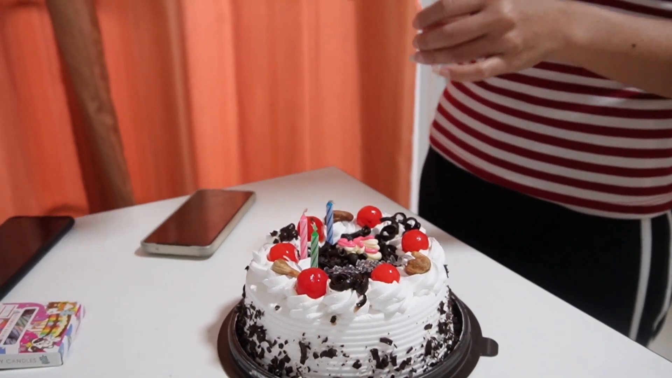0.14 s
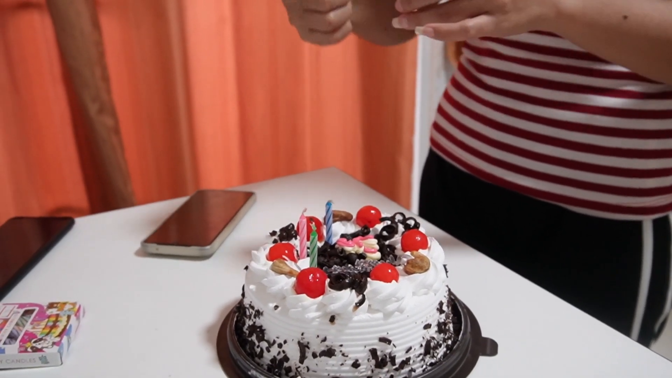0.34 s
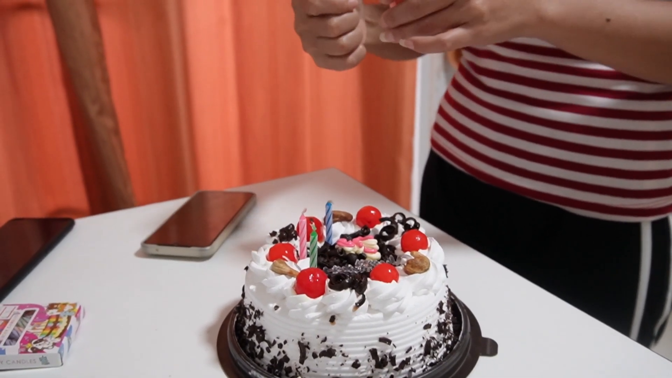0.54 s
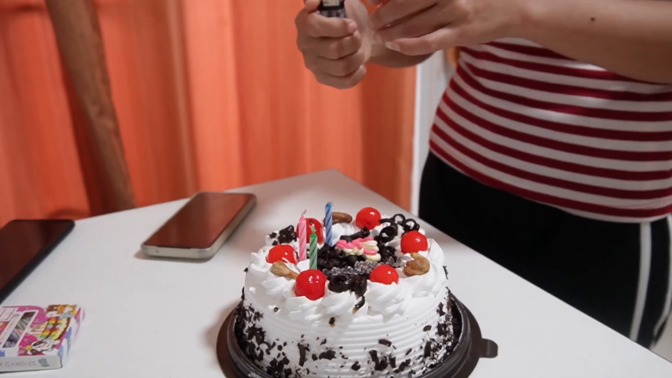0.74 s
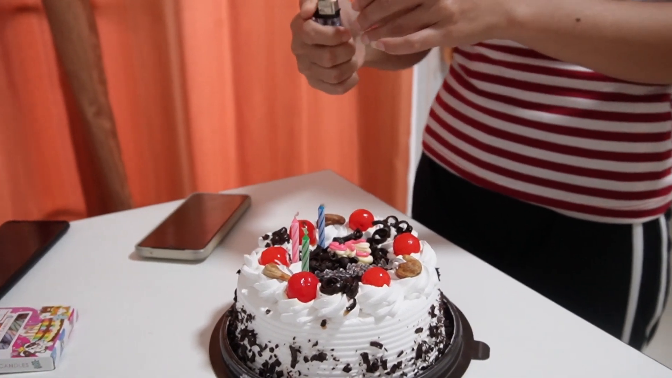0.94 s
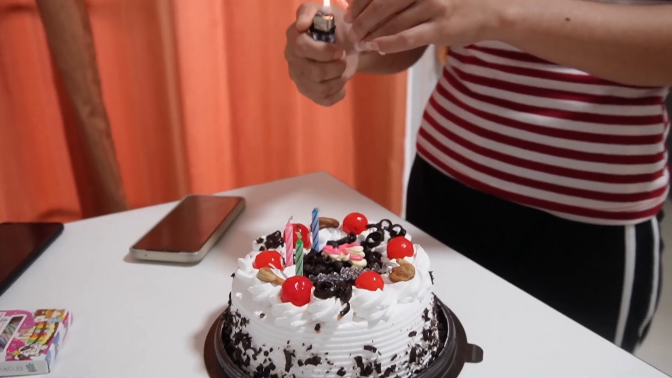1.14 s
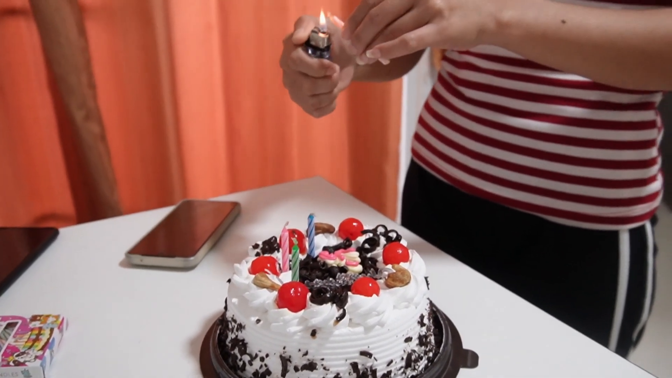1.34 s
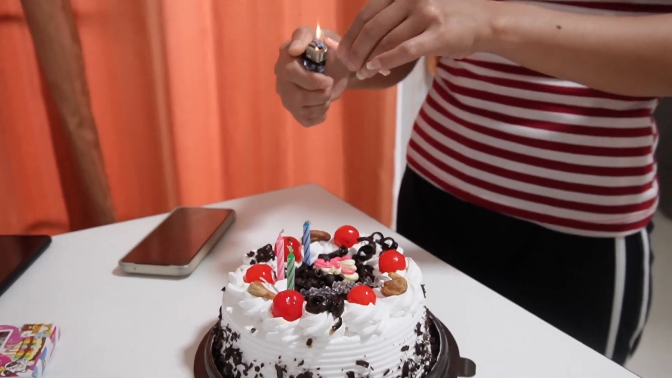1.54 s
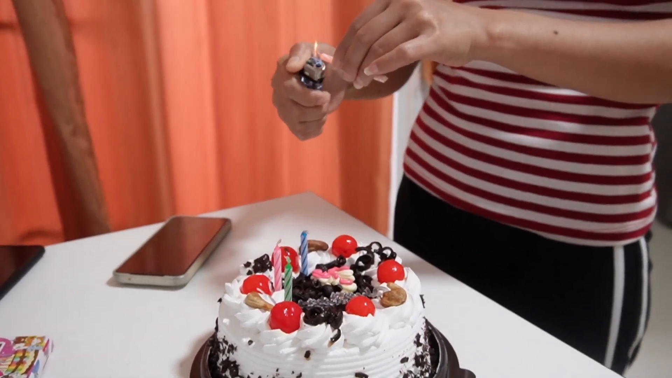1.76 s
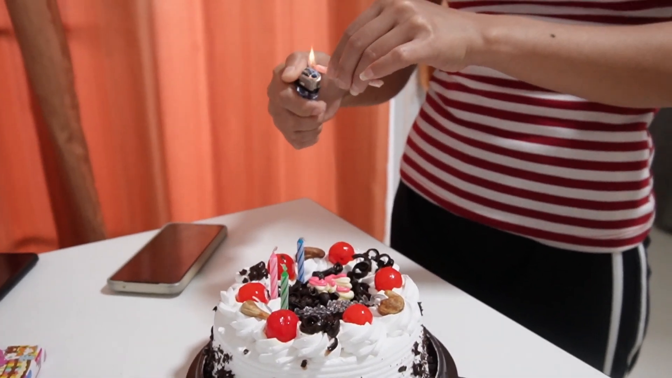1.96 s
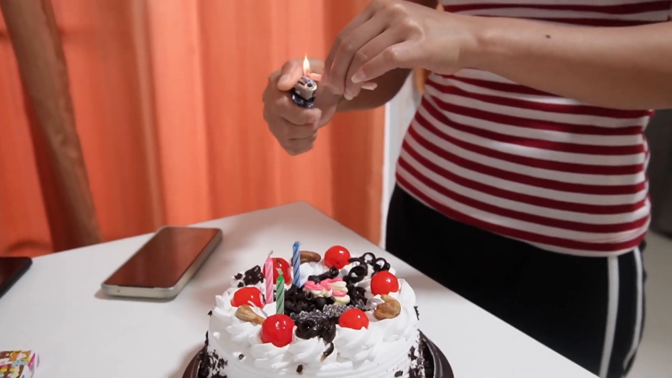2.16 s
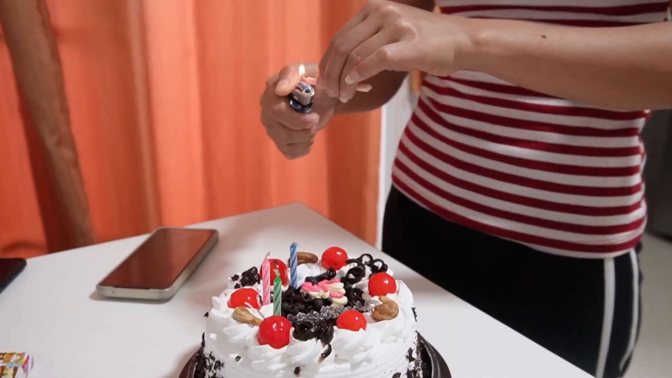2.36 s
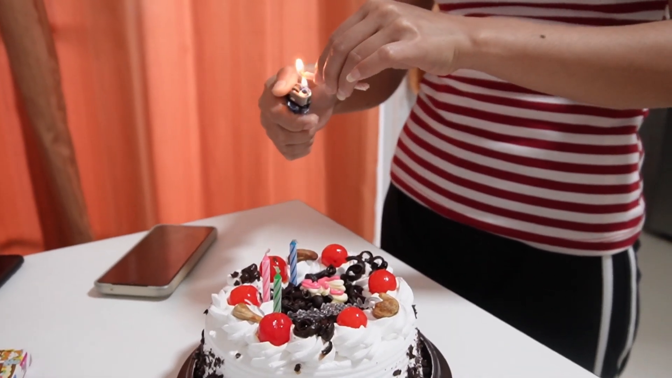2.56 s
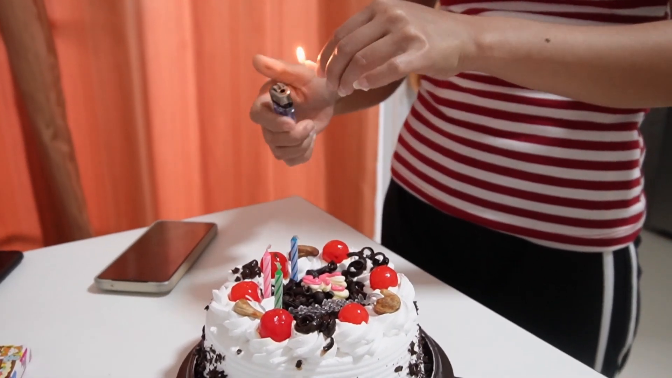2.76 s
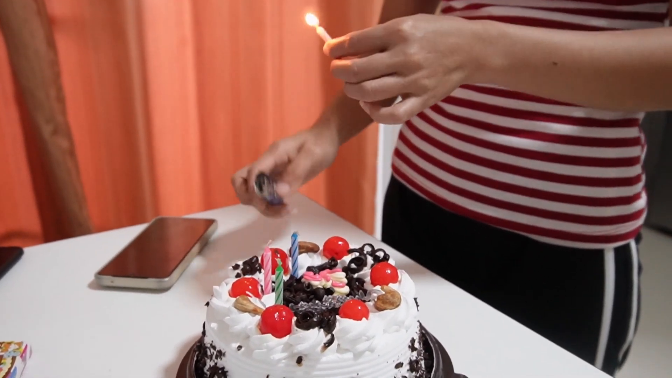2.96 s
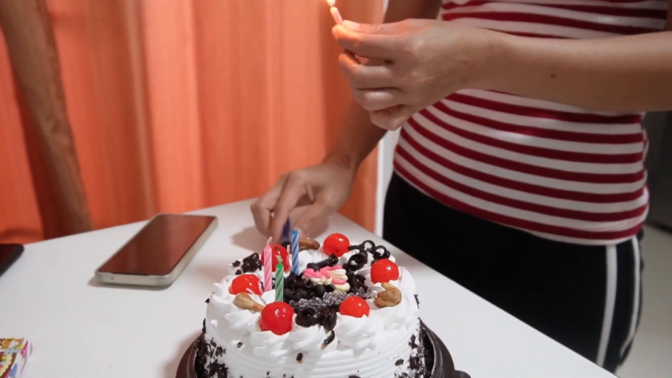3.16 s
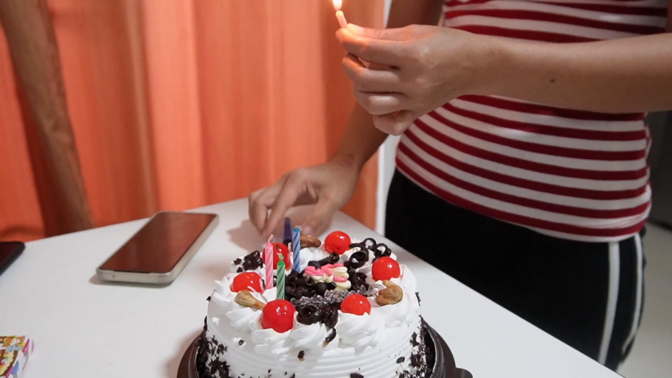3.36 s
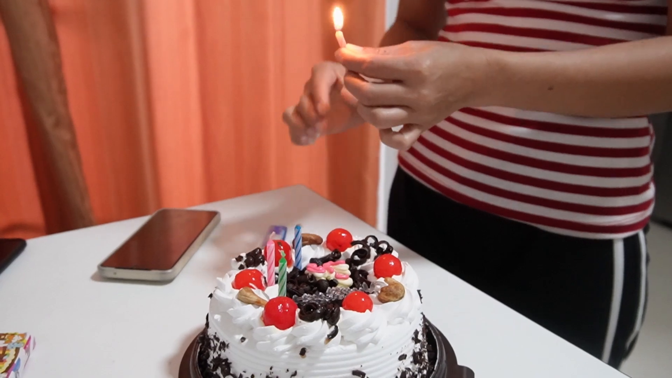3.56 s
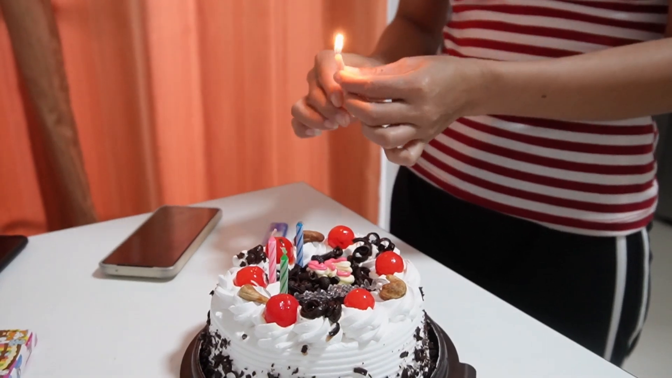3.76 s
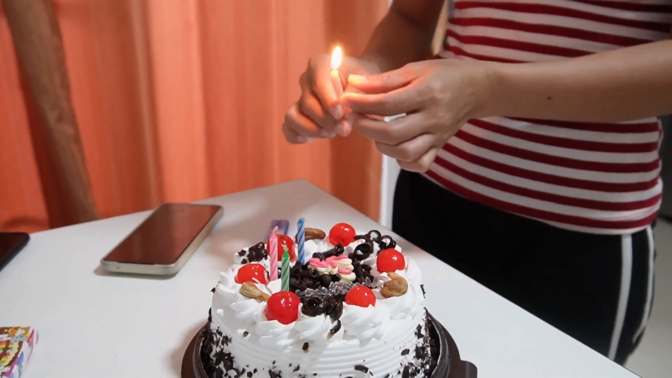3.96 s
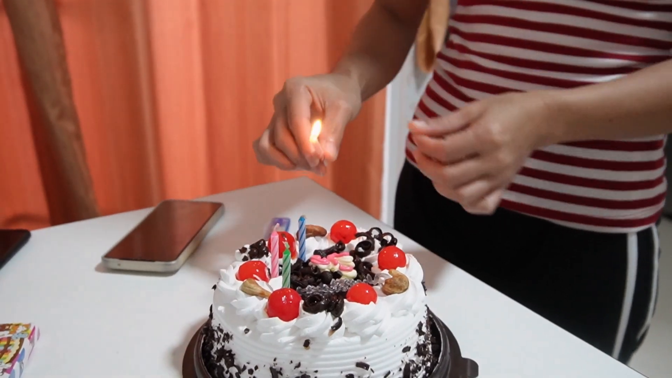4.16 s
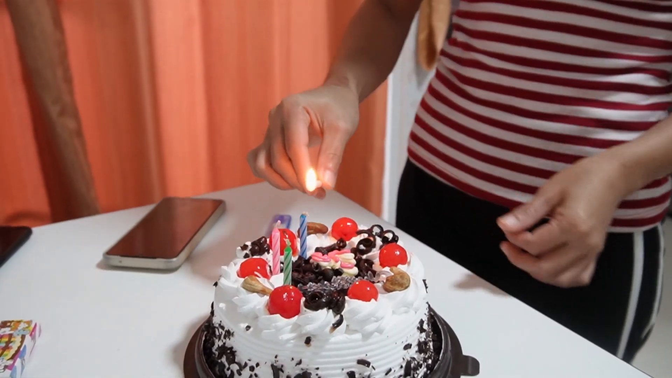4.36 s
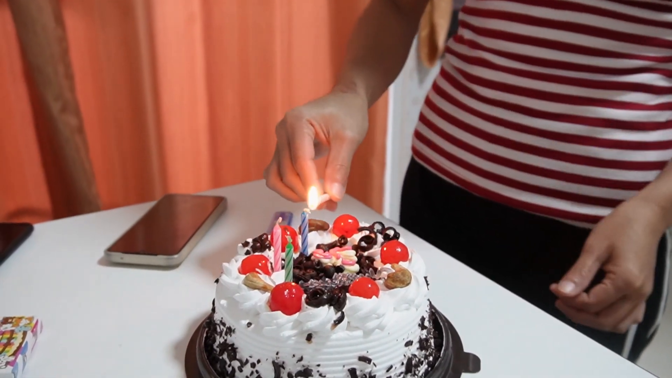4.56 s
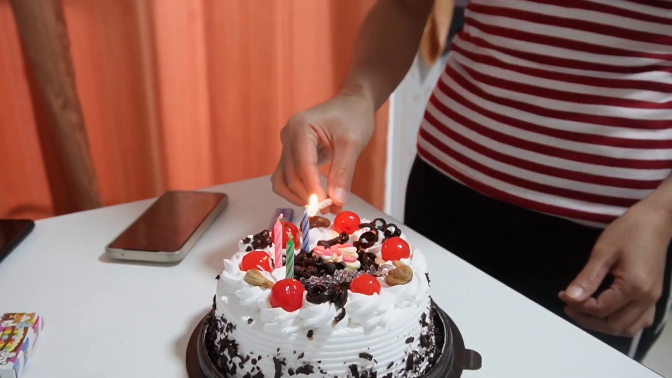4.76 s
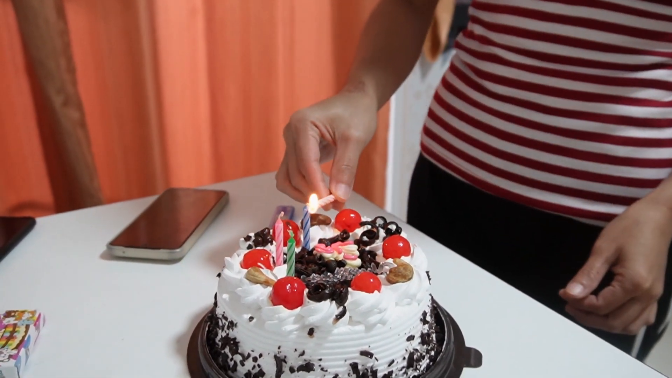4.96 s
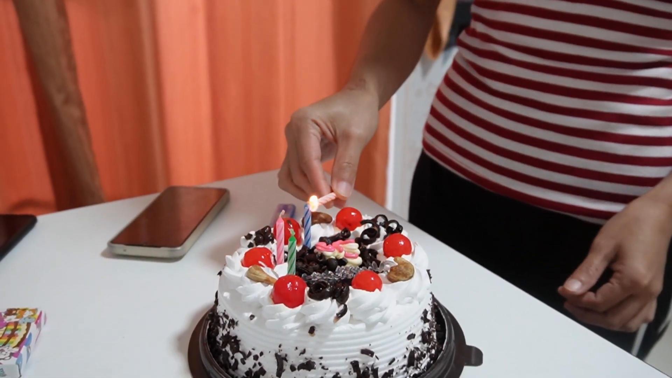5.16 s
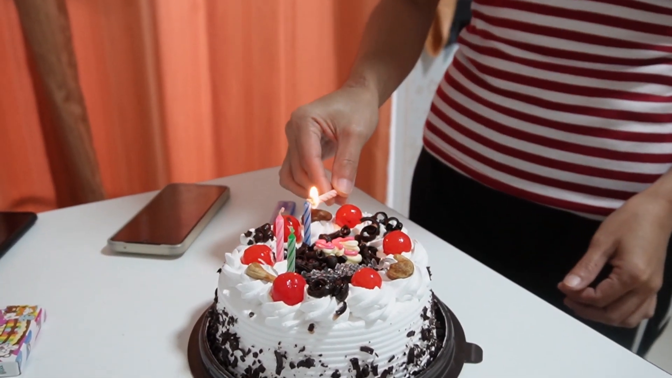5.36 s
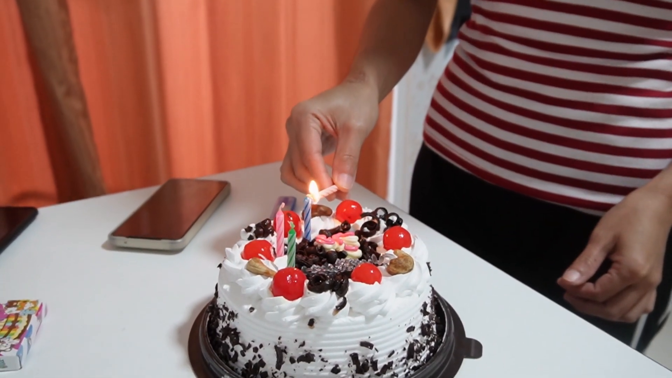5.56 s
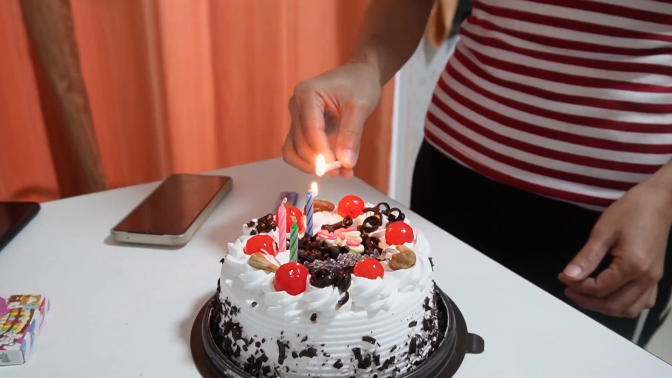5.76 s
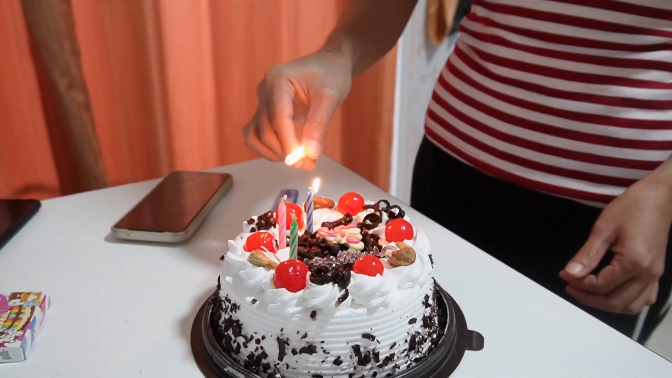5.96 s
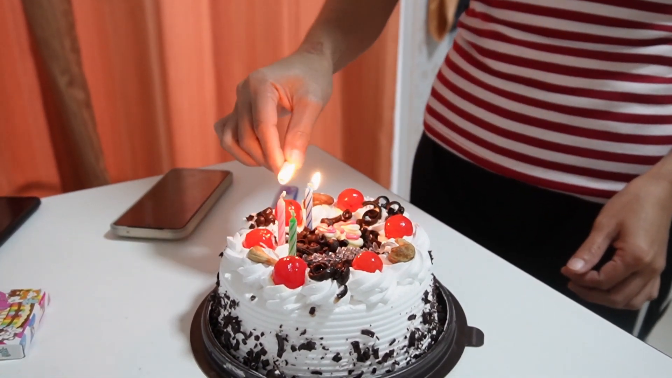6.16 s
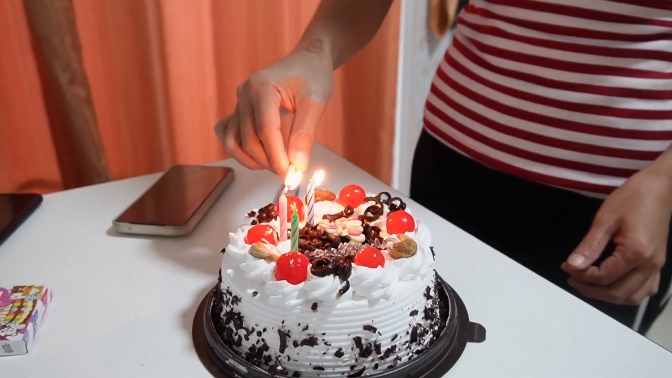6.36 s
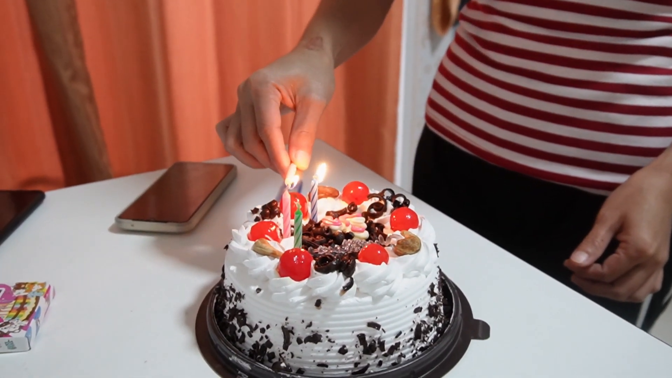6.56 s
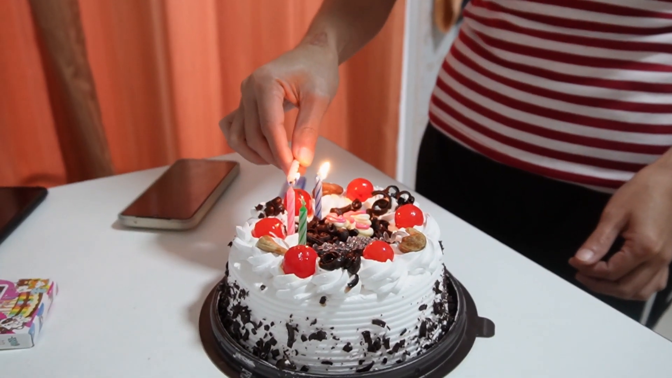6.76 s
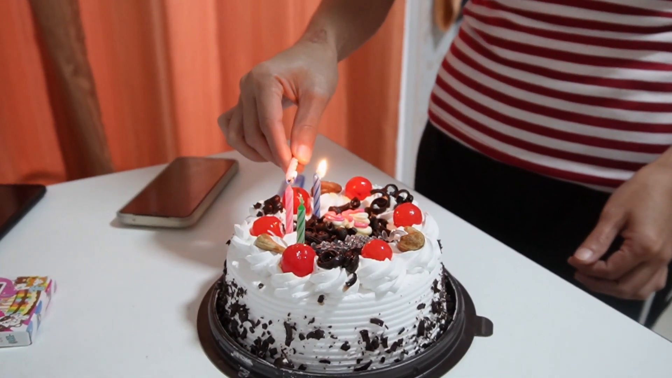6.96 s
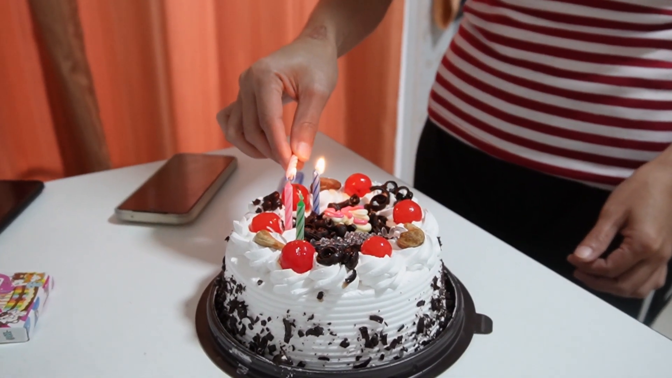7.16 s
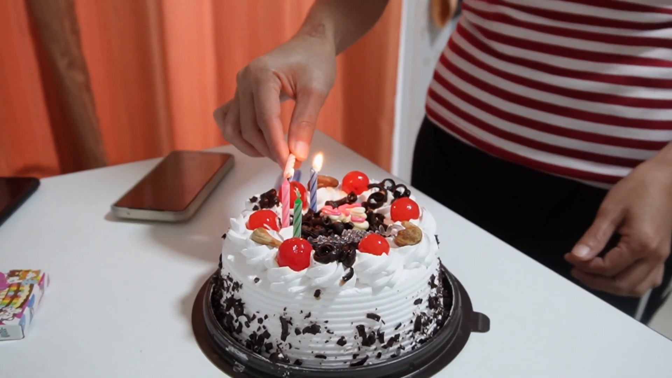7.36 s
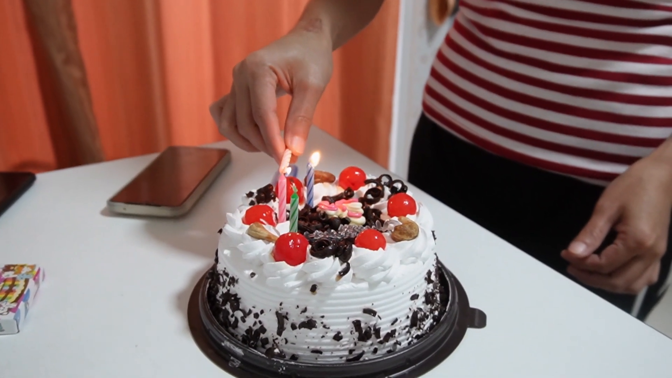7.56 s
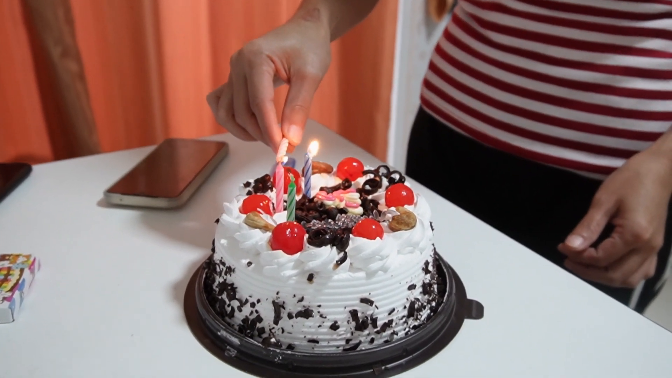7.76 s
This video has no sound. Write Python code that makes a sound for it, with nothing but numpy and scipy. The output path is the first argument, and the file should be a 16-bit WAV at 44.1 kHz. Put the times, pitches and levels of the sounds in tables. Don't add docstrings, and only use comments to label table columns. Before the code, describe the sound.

A steady low compressor hum, near 50 Hz with overtones, throbs about four times a second throughout, with a soft rough rattle, room rumble and faint microphone hiss. From 0 to 0.6 s a sleeve brushes softly, with tiny metallic ticks. At 0.56 s small gritty slips quicken into a sharp, bright flint-wheel rasp at 0.68-0.72 s, with a small low thud, slightly left; a faint gas hiss fades until about 1.5 s. Small clicks fall at 1.0 and 1.34 s. Then only hum, its bottom dipping and swelling back. At 3.19 and 3.26 s the lighter clacks on a hard table with a light slide; louder rocking knocks follow at 3.5-3.6 s with a short scrape and metal tick, echoing briefly. Hum alone continues. From 6.76 s thin wax spits lead to a faint high sizzle at 7.1 s; dry plastic ticks creak near left at 7.4-7.8 s.

```python
import sys
import numpy as np
from scipy import signal
from scipy.fft import rfft, irfft
from scipy.io import wavfile

SR = 44100
rng = np.random.default_rng(int(sys.argv[2]) if len(sys.argv) > 2 else 0)


def to_linear_factor(level_db):
    exponent = np.asarray(level_db, float) / 20
    return 10 ** exponent


def master(y):
    cut = np.clip(np.atleast_2d(y).T, -1, 1)
    pcm = np.round(cut * 32767)
    wavfile.write(sys.argv[1], SR, pcm.astype(np.int16))


N = 344862

# (time [s], peak level [dB], length [ms])
CREEP_SLIPS = [(.562, -50, 4), (.578, -45, 6), (.618, -41, 4), (.636, -39, 5), (.645, -40, 6),
               (.659, -36, 3), (.665, -31, 4)]
# (start [s], rise [s], hold [s], fall [s], level [dB])
THUMB_RUB = [
    (.575, 0.0044, .02, .02, -60),
    (.61, 0.025, .025, .008, -52),
]
# (start [s], rise [s], hold [s], fall [s], level [dB])
FREE_SPIN = [
    (0.675, 0.0031, 0.026, 0.0087, -36.5),
]
TOOTH_TIMES = [.679, .6845, .687, .6925, .697, .7, .7057, .7105, .7157]
# (frequency [Hz], density [dB per Hz])
FLINT_SPECTRUM = [(500, -11), (1200, -12.5), (2000, -14.5), (3000, -4.5), (4500, -3), (8000, 0),
                  (11000, -3.5), (16000, -16)]
# (start [s], rise [s], hold [s], fall [s], level [dB rms])
GAS_FLOW = [
    (.7, .03, 0.1, 0.75, -64),
]
# (frequency [Hz], level [dB])
JET_SPECTRUM = [(1500, -9.5), (4000, 7), (8000, -2.5), (11000, -2.5), (15000, -7)]
# (time [s], peak level [dB], pitch [Hz], metal tick level [dB], shell ring level [dB])
BODY_KNOCKS = [(.5775, -39, 2200, -30, -20), (1.0122, -35, 3100, -9, -18), (3.1852, -9.5, 3800, -15, -26),
               (3.194, -30, 5200, -16, -22), (3.2064, -25, 3200, -16, -10), (3.2643, -5, 3600, -30, -9),
               (3.2682, -14, 1800, -28, -2), (3.5061, -13, 2800, -36, -14), (3.5145, -30, 4600, -30, -20),
               (3.5458, -1, 2900, -22, -12), (3.5485, -13, 2000, -24, -8), (3.567, -17, 2600, -20, -8),
               (3.5961, -5, 2500, -15, -12)]
# (frequency [Hz], level [dB], t60 [s])
SHELL_MODES = [(1250, -11, .01), (1640, -3, .02), (1870, -3, .012), (2160, 0, .015), (2590, -1, .012),
               (2900, -4, .01), (3540, -9, .008), (4050, -8, .008), (5500, -9, .005)]
# (frequency [Hz], level [dB])
TABLE_TOP_SPECTRUM = [(150, -15), (280, 3), (550, -2.5), (850, 5.5), (1300, 2), (2000, -2.5), (3500, -9.5),
                      (6000, -26.5)]
# (start [s], rise [s], hold [s], fall [s], level [dB rms])
DRAG_STROKES = [
    (3.183, 0.016, 0.033, 0.027, -38.5),
    (3.547, .006, 0.0022, 0.028, -30),
]
# (frequency [Hz], level [dB])
DRAG_SPECTRUM = [(300, -28), (900, -10.5), (1800, -0.5), (3500, 1.5), (5500, -3.5), (7500, -13.5),
                 (15000, -28.5)]
# (time [s], peak level [dB], pitch [Hz], ring t60 [s])
CAP_TICKS = [(.071, -60, 3500, .01), (.158, -55, 13000, .012), (.17, -58, 13200, .006),
             (.179, -49, 6750, .1), (.182, -60, 10000, .04), (1.336, -47, 6500, .012),
             (1.338, -51, 4300, .025), (3.548, -40, 6750, .1), (3.5975, -37, 6750, .2),
             (3.5975, -27, 7200, .003), (3.598, -30, 10000, .003), (3.602, -52, 14600, .03)]
# (start [s], rise [s], hold [s], fall [s], level [dB rms])
SIZZLE_STROKES = [
    (7.06, 0.066, 0.068, 0.17, -63),
    (7.3, 0.16, .3, .1, -71.5),
]
# (frequency [Hz], level [dB])
WICK_SPECTRUM = [(3500, -30), (5000, -1.5), (6500, -3), (9000, -5), (11500, -13), (12800, -11),
                 (14500, -15)]
# (start [s], rise [s], hold [s], fall [s], level [dB rms])
WAX_SPITS = [
    (6.76, .05, 0.15, .04, -76),
    (6.95, 0.023, 0.011, 0.028, -73),
    (7.02, 0.027, 0.13, .05, -76),
]
# (frequency [Hz], level [dB])
WAX_SPECTRUM = [(8500, -21), (10000, -4), (11400, -15), (12800, -4), (14200, -22)]
# (time [s], peak level [dB])
CREAK_TICKS = [(7.4196, -56), (7.4392, -54), (7.4575, -54), (7.4763, -52), (7.498, -51), (7.529, -57),
               (7.5645, -53), (7.5965, -49.5), (7.6218, -54), (7.6692, -62), (7.683, -48), (7.7086, -51),
               (7.7356, -48.5), (7.755, -46), (7.779, -44), (7.8075, -47)]
# (frequency [Hz], level [dB], t60 [s])
PLASTIC_MODES = [(4500, 17, 0.018), (5930, -11.5, 0.0046), (9000, 5, 0.0037), (10350, 21, 0.0036),
                 (12800, -23, .004), (15100, 5, .003)]
# (start [s], rise [s], hold [s], fall [s], level [dB rms])
SLEEVE_BRUSHES = [
    (0, .07, 0.037, .1, -64),
    (.1, 0.078, .02, 0.45, -59),
]
# (frequency [Hz], level [dB])
CLOTH_SPECTRUM = [(700, -24.5), (1500, 1), (2500, -4.5), (4000, -12.5), (10000, -20.5), (15000, -24.5)]
# (shaft order, level [dB rms])
SHAFT_ORDERS = [(2, -59), (3, -53), (4, -50), (5, -54), (6, -59), (7, -55), (8, -72), (9, -69), (10, -79),
                (11, -71), (12, -71), (13, -68), (14, -68)]
# (neighbour order, pull order, level [dB rms], first beat crest [s])
PULL_TONES = [(2, 1, -58, 0.017), (3, 1, -55, 0.016), (4, 1, -55, 0.169), (4, 2, -56, 0.089),
              (5, 1, -72, 0.172), (6, 1, -84, 0.165), (7, 1, -69, 0.146)]
# (time [s], level [dB rms])
LOWEST_TONE = [(0.0, -46), (.8, -53.5), (1.9, -52), (2.4, -59), (3.1, -49), (4.7, -47), (5.66, -43.5),
               (7.82, -45)]
FAN_ORDERS = [-66, -68, -66, -65, -68]
# (shaft order, level [dB rms])
SLIP_SIDEBANDS = [(3, -69), (4, -62), (5, -69)]
# (frequency [Hz], level [dB rms])
OTHER_TONES = [(114.88, -69), (143.75, -66), (155.88, -68), (189.05, -70), (207.4, -67), (208.9, -65),
               (214.93, -68)]
# (frequency [Hz], level [dB])
VALVE_SPECTRUM = [(300, -37.5), (450, -15), (680, 6), (900, -5.5), (1500, -30.5), (2500, -41)]
# (frequency [Hz], density [dB per Hz])
AIR_SPECTRUM = [(28, -24), (45, -13.5), (64, -10.5), (120, -3), (200, -0.5), (320, -2.5), (380, -10),
                (680, -10), (850, -17), (1500, -22.5), (2500, -28.5), (5000, -37.5), (12000, -44),
                (16000, -45)]
# (frequency [Hz], width [Hz], level [dB])
CAPSULE_RESONANCES = [(3730, 63, -1.5), (5850, 440, -9), (6230, 280, 1), (8900, 200, -0.5),
                      (9870, 200, 2.5), (14000, 540, -11), (15300, 140, -9.5)]
# (frequency [Hz], side minus mid [dB])
DIFFUSE_WIDTH = [(60, -41), (110, -23.5), (200, -26), (380, -13.5), (700, -13), (1290, -8.5), (2380, -6.5),
                 (4400, -3.5), (8120, -2), (15000, 0)]
# (frequency [Hz], t60 [s])
ROOM_DECAY = [(200, 0.664), (660, 0.34), (1740, 0.51), (3000, 0.49), (4590, 0.47), (9000, 0.5),
              (15000, 0.4)]
# (delay [ms], share of direct sound, left lead [ms])
SURFACE_ECHOES = [(.56, 1.0, .03), (.85, .4, -.04), (1.9, .25, .04), (4.3, .3, -.03), (8, .15, .05)]
# (frequency [Hz], level [dB])
WALL_COLOUR = [(200, 1), (1500, 0), (2500, 0), (4000, -3), (7000, -3), (15000, -6)]
# (frequency [Hz], level [dB])
TABLE_HEIGHT_COLOUR = [(200, -3), (700, 1), (1500, -3), (2400, 1), (4000, -7.5), (7000, 0.5), (15000, -4)]

SHAFT_HZ, PULL_HZ, FAN_HZ, SLIP_HZ = 48.237, 100.11, 44.32, 7.53
VALVES_DB, AIR_DB = -66, -49.5
BITE_S, BITE_DB, BITE_RISE_DB_PER_S, BITE_FALL_DB_PER_S = .685, -20, 1300, -30
BITE_MS, BITE_SHRINK_MS_PER_S = 3.6, 62.
THUD_DB, THUD_DB_PER_OCTAVE = -14.5, -40
LEFT_DB, LEFTWARD_DB_PER_S = 12, 30
RANGE_DB = 20
PUT_DOWN_S = 3.1
LAID_FLAT_S = 3.48


def evened(x):
    return x / np.sqrt(np.mean(x ** 2) + 1e-20)


def read(points, hz):
    f, value = np.transpose(points)
    return np.interp(np.log(hz + 1), np.log(f + 1), value)


def coloured(x, points):
    n = x.shape[-1]
    response = to_linear_factor(read(points, np.fft.rfftfreq(n, 1 / SR)))
    return irfft(rfft(x) * response, n)


def add(mix, s, sound):
    part = mix[..., round(s * SR):][..., :sound.shape[-1]]
    part += sound[..., :part.shape[-1]]


def ring(modes, t):
    out = np.zeros(len(t))
    for hz, db, t60 in modes:
        detune = 1 + .012 * rng.uniform(-1, 1)
        out += to_linear_factor(db - 60 * t / t60) * np.sin(2 * np.pi * (hz * detune * t + rng.random()))
    return out / abs(out).max()


def diffuse(mid, side):
    side = coloured(side, DIFFUSE_WIDTH)
    return np.array([mid + side, mid - side])


def stroke(rows):
    t, out = np.arange(N) / SR, np.zeros(N)
    for s, rise, hold, fall, db in rows:
        corners = s + np.cumsum([0, rise, hold, fall, fall])
        depth = np.interp(t, corners, [1, 0, 0, 1, 3], 6, 6)
        out += to_linear_factor(db - RANGE_DB * depth)
    return out


def hiss(rows, colour):
    mid, side = stroke(rows) * evened(coloured(rng.standard_normal((2, N)), colour))
    return diffuse(mid, side)


def uneven_grit(spread_db):
    return rng.standard_normal(N) * to_linear_factor(spread_db * np.minimum(rng.exponential(1, N), 5))


def wheel():
    t, pressure = np.arange(2000) / SR, stroke(THUMB_RUB + FREE_SPIN)
    slips = list(CREEP_SLIPS)
    for s in TOOTH_TIMES:
        drop_db = max(BITE_RISE_DB_PER_S * (BITE_S - s), BITE_FALL_DB_PER_S * (s - BITE_S))
        ms = max(BITE_MS - BITE_SHRINK_MS_PER_S * (s - TOOTH_TIMES[0]), .5)
        slips.append((s, BITE_DB - drop_db, ms))
    for s, db, ms in slips:
        u = t * 1000 / ms
        add(pressure, s - ms / 2000, to_linear_factor(db) * u * np.exp(1 - 2 * u))
    lever_modes = [(230.5, -14, 0.12), (297, 7, 0.02), (1050, -19, .02)]  # (Hz, dB, t60 s)
    thud = np.zeros(N)
    add(thud, .698, to_linear_factor(-22) * ring(lever_modes, t) * np.minimum(t / 0.0047, 1))
    return pressure * evened(coloured(uneven_grit(2.2), FLINT_SPECTRUM)) + thud


def knocks():
    t, out = np.arange(6000) / SR, np.zeros(N)
    for s, db, hz, tick_db, shell_db in BODY_KNOCKS:
        u = (t - .001) * hz
        bell = np.exp(-(u / 0.52) ** 2)
        push = np.cos(2 * np.pi * u - .4) * bell
        push -= bell * push.sum() / bell.sum()
        tick = signal.lfilter([.5], [1, -.75], rng.standard_normal(len(t))) * np.exp(-t / .002)
        thud = evened(coloured(rng.standard_normal(len(t)), TABLE_TOP_SPECTRUM)) * np.exp(-t / 0.005)
        thud_db = THUD_DB + THUD_DB_PER_OCTAVE * np.log2(max(hz, 2900) / 2900)
        rings = to_linear_factor(tick_db) * tick + to_linear_factor(shell_db) * ring(SHELL_MODES, t) + to_linear_factor(thud_db) * thud
        onset = np.clip((t - .0008) / 0.00019, 0, 1)
        add(out, s - .001, to_linear_factor(db) * (push + onset * rings))
    return out


def drag():
    return stroke(DRAG_STROKES) * evened(coloured(uneven_grit(2.5), DRAG_SPECTRUM))


def cap():
    t, out = np.arange(4000) / SR, np.zeros(N)
    for s, db, hz, t60 in CAP_TICKS:
        click = .1 * rng.standard_normal(len(t)) * np.exp(-t / 0.00068)
        double_ring = ring([(hz, 0, t60), (hz * .94, -3, .5 * t60)], t)
        add(out, s, to_linear_factor(db) * (click + double_ring))
    return out


def wick():
    return hiss(SIZZLE_STROKES, WICK_SPECTRUM) + hiss(WAX_SPITS, WAX_SPECTRUM)


def creak():
    t, out = np.arange(1500) / SR, np.zeros((2, N))
    for s, db in CREAK_TICKS:
        pan_db = LEFT_DB + LEFTWARD_DB_PER_S * (s - CREAK_TICKS[0][0])
        scratch = evened(coloured(rng.standard_normal(len(t)), WICK_SPECTRUM)) * np.exp(-t / 0.0019)
        tick = .5 * ring(PLASTIC_MODES, t) + .35 * scratch
        add(out, s, to_linear_factor(db + np.array([[pan_db], [-pan_db]]) / 2) * tick)
    return out


def gas():
    return hiss(GAS_FLOW, JET_SPECTRUM)


def sleeve():
    return hiss(SLEEVE_BRUSHES, CLOTH_SPECTRUM)


def compressor():
    t, start = np.arange(N) / SR, rng.random(20)
    hum = to_linear_factor(np.interp(t, *np.transpose(LOWEST_TONE))) * np.cos(2 * np.pi * SHAFT_HZ * t)
    for k, db in SHAFT_ORDERS:
        hum += to_linear_factor(db) * np.cos(2 * np.pi * (k * SHAFT_HZ * t + start[k]))
    for k, m, db, crest in PULL_TONES:
        beat_hz = m * (PULL_HZ - 2 * SHAFT_HZ)
        hum += to_linear_factor(db) * np.cos(2 * np.pi * (k * SHAFT_HZ * t + start[k] + beat_hz * (t - crest)))
    faint = [(k * FAN_HZ, db) for k, db in enumerate(FAN_ORDERS, 1)]
    faint += [(k * SHAFT_HZ - SLIP_HZ, db) for k, db in SLIP_SIDEBANDS]
    faint += list(OTHER_TONES)
    for hz, db in faint:
        hum += to_linear_factor(db) * np.cos(2 * np.pi * (hz * t + rng.random()))
    return np.sqrt(2) * hum


def valves():
    turns = SHAFT_HZ * np.arange(N) / SR
    puffs = rng.standard_normal((2, N)) * np.exp(-(turns % 1) / .12)
    mid, side = coloured(puffs, VALVE_SPECTRUM)
    return to_linear_factor(VALVES_DB) / mid.std() * diffuse(mid, side)


def air():
    hz = np.fft.rfftfreq(N, 1 / SR)
    lift = 1
    for f, width, db in CAPSULE_RESONANCES:
        lift = lift + to_linear_factor(db + 3) / (1 + (2 * (hz - f) / width) ** 2)
    noise = irfft(rfft(rng.standard_normal((2, N))) * lift, N)
    mid, side = coloured(noise, AIR_SPECTRUM)
    return to_linear_factor(AIR_DB) / mid.std() * diffuse(mid, side)


def room(x, wet_db, rise, nearness, spread, colour=WALL_COLOUR):
    near = np.zeros((2, 500))
    near[:, 0] = 1
    for ms, share, lead_ms in SURFACE_ECHOES:
        arrival = (ms + np.array([[-lead_ms], [lead_ms]])) * SR / 1000
        near += nearness * share * np.sinc(np.arange(500) - arrival)
    taps = np.zeros((2, SR))
    slots = np.arange(60, SR - 20, 10)
    at = slots + rng.integers(0, 10, (2, len(slots)))
    np.put_along_axis(taps, at, rng.choice([-1., 1.], at.shape), 1)
    hz, t, z = signal.stft(taps, SR, nperseg=256)
    z /= abs(z) ** .8 + 1e-9
    decay = to_linear_factor(-60 * t / read(ROOM_DECAY, hz)[:, None])
    tail = signal.istft(z * decay, SR, nperseg=256)[1][:, :SR]
    mid, side = coloured(tail, colour)
    tail = diffuse(mid, spread * side) * (1 - np.exp(-np.arange(SR) / SR / rise))
    tail *= to_linear_factor(wet_db) / np.linalg.norm(tail[0])
    early = signal.oaconvolve(x[None], near, axes=1)[:, :N]
    late = signal.fftconvolve(x[None], tail, axes=1)[:, :N]
    return early + late


def scene():
    body, t = knocks() + drag(), np.arange(N) / SR
    held, flat = t < PUT_DOWN_S, t > LAID_FLAT_S
    in_hand = room(wheel() + body * held, wet_db=-7.5, rise=.006, nearness=0.17, spread=1.16)
    in_hand = in_hand * to_linear_factor([[.4], [-.4]])
    on_table = room(body * ~(held | flat), wet_db=3.5, rise=.004, nearness=1.0, spread=0.7,
                    colour=TABLE_HEIGHT_COLOUR)
    on_table += room(body * flat, wet_db=-1, rise=.003, nearness=0.36, spread=0.81,
                     colour=TABLE_HEIGHT_COLOUR)
    metal = room(cap(), wet_db=-7, rise=0.004, nearness=0.4, spread=1.1)
    creaks = creak()
    creaks = creaks + 0.083 * room(creaks[0], wet_db=13, rise=0.0055, nearness=.1, spread=.95)
    machines = compressor() + valves() + air()
    return in_hand + on_table + metal + wick() + creaks + gas() + sleeve() + machines


def roll_off(x):
    return signal.sosfilt(signal.butter(12, 16510, fs=SR, output="sos"), x)


def record(dry):
    return roll_off(dry)


dry = scene()
out = record(dry)
master(out)
```